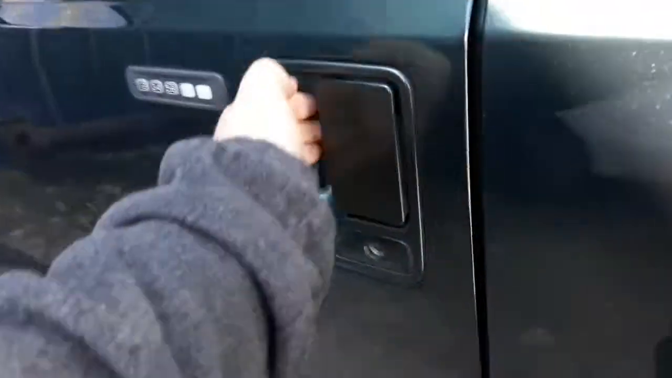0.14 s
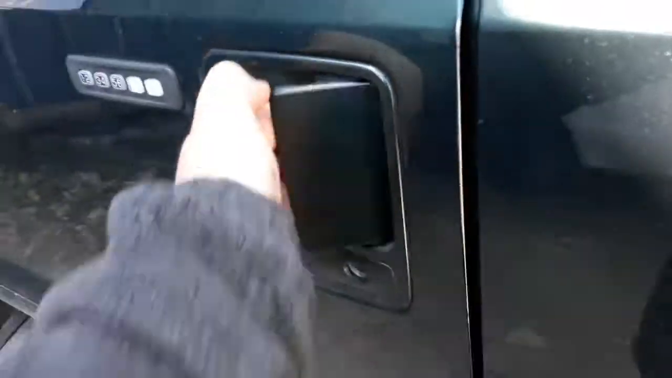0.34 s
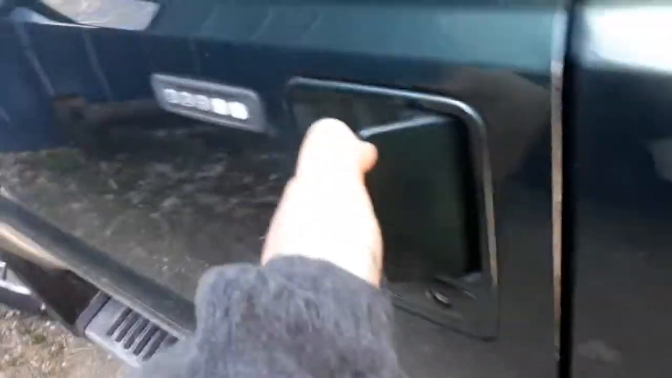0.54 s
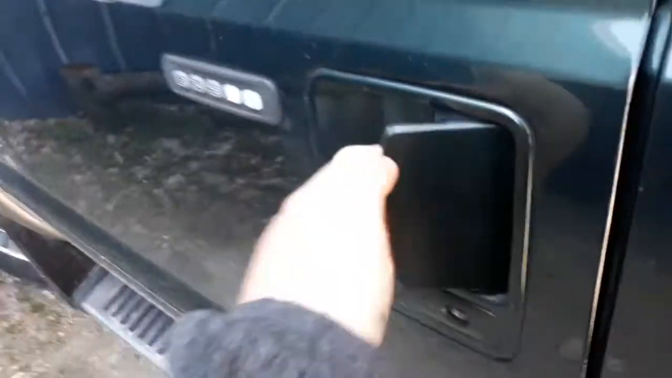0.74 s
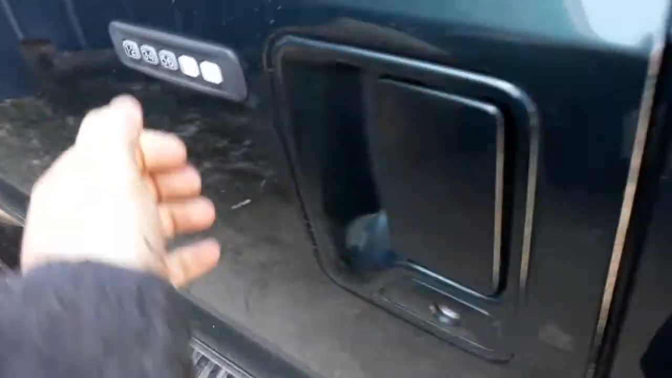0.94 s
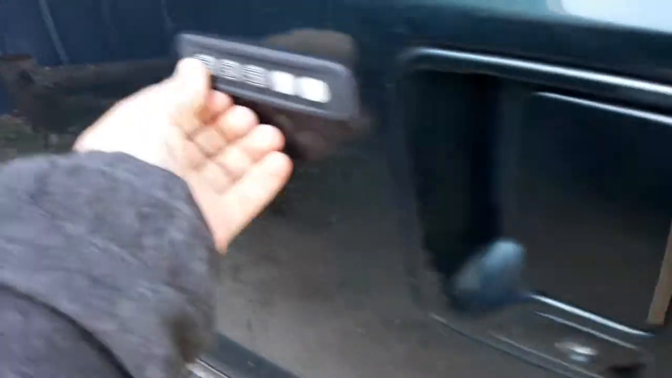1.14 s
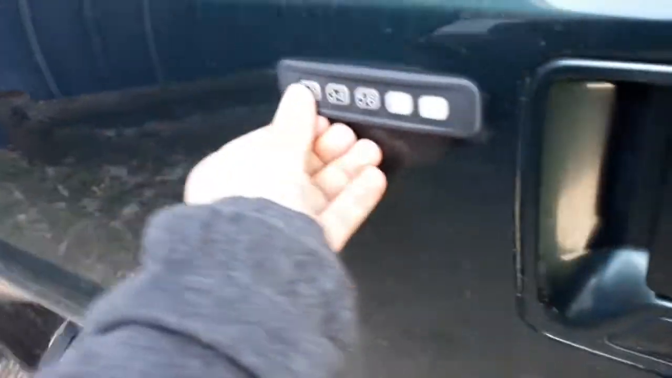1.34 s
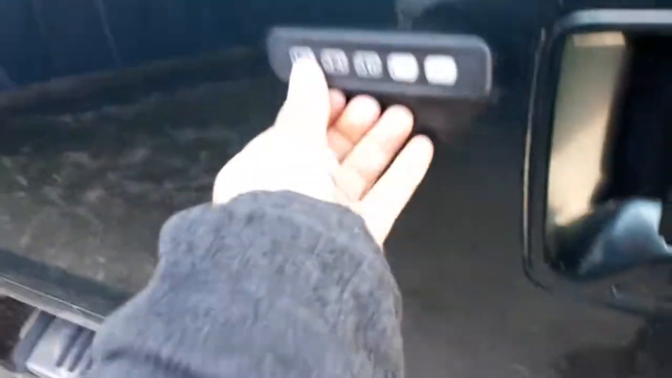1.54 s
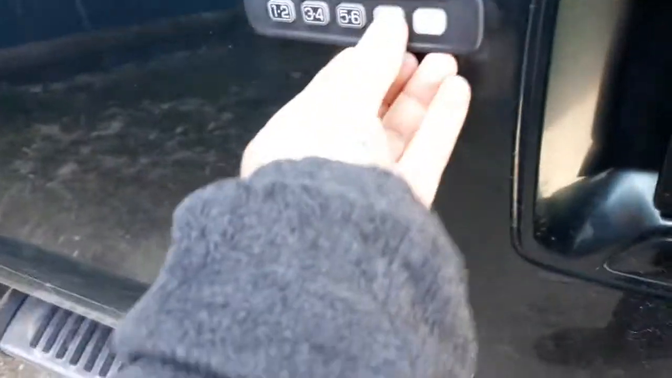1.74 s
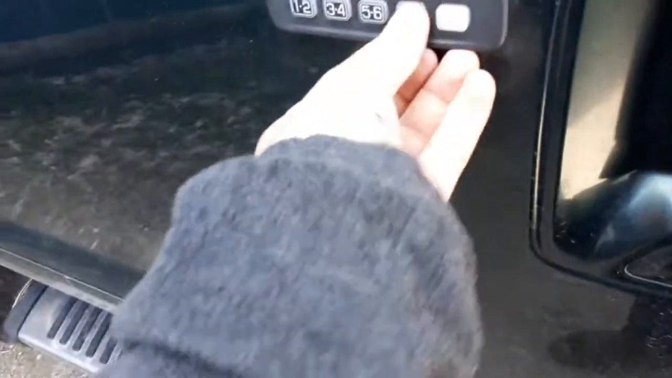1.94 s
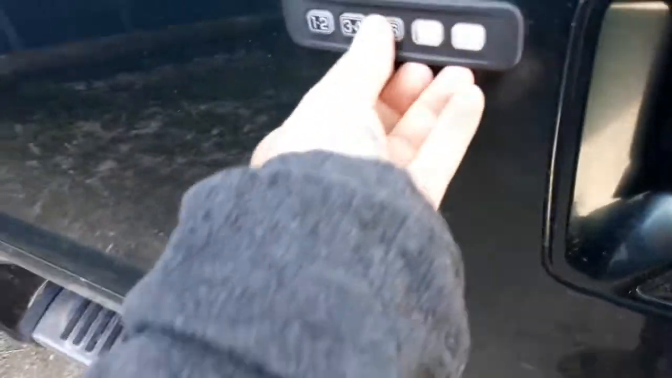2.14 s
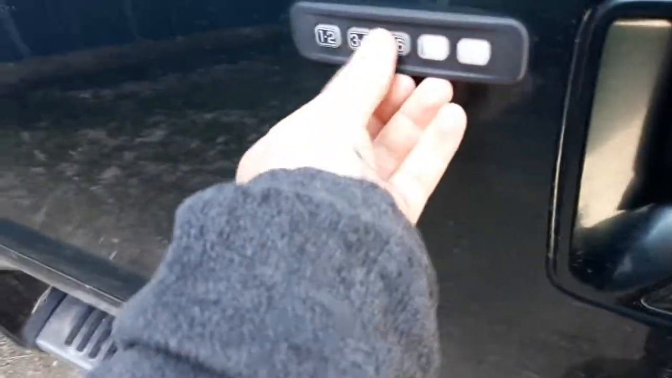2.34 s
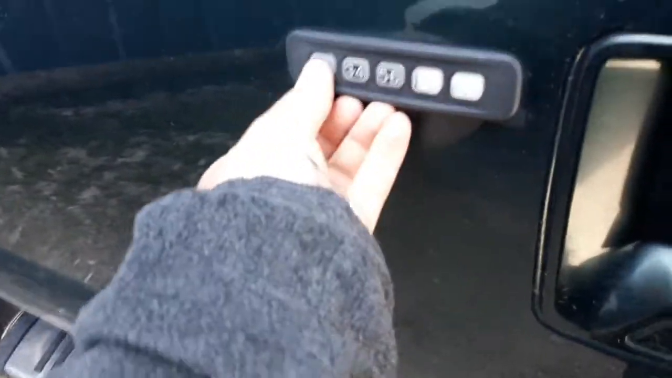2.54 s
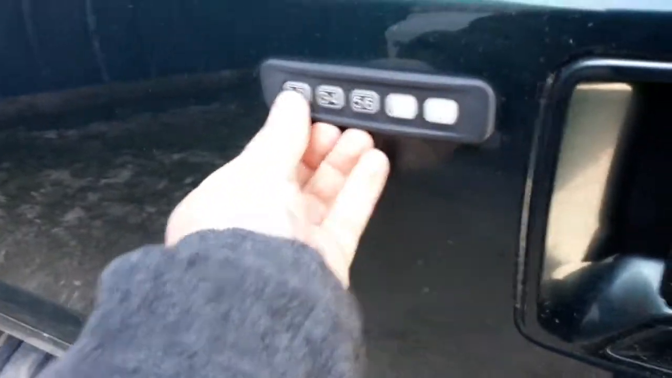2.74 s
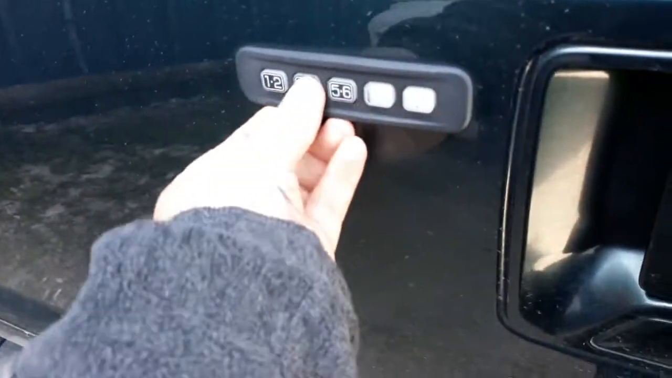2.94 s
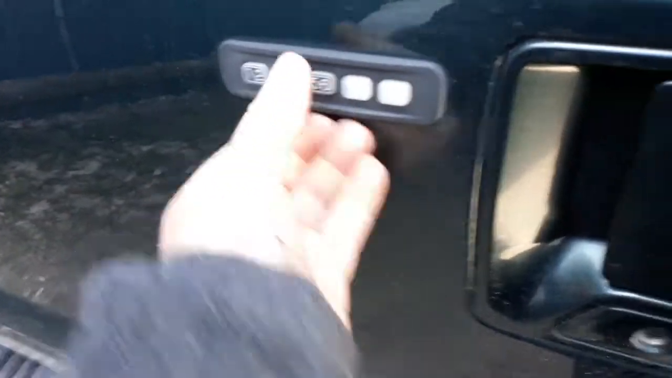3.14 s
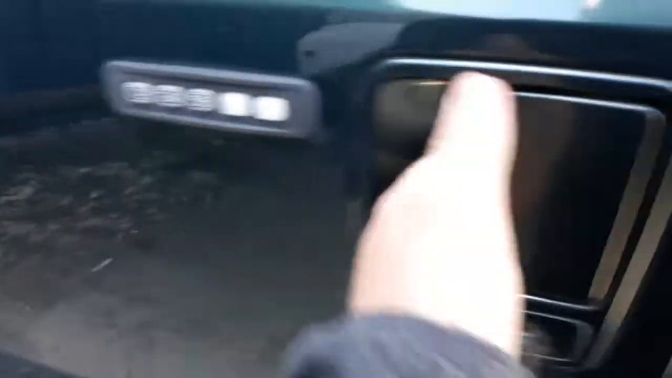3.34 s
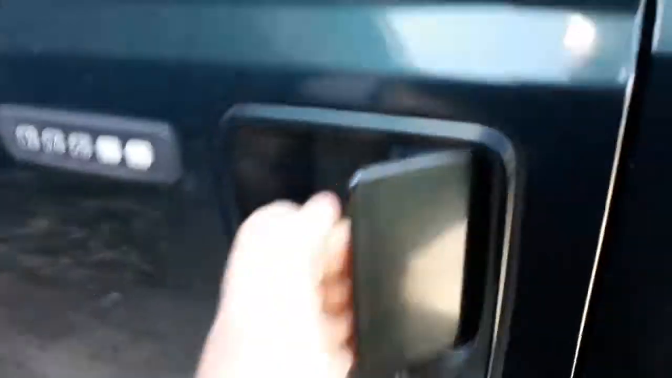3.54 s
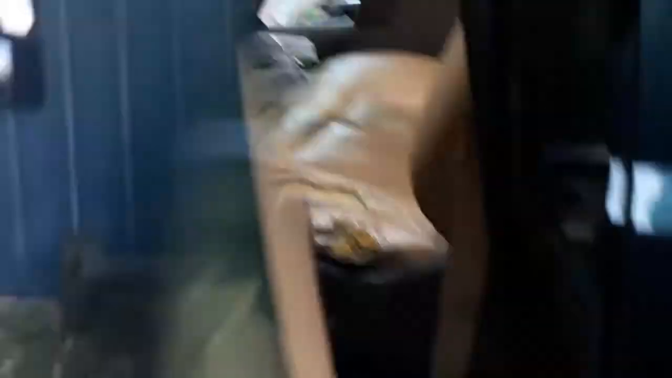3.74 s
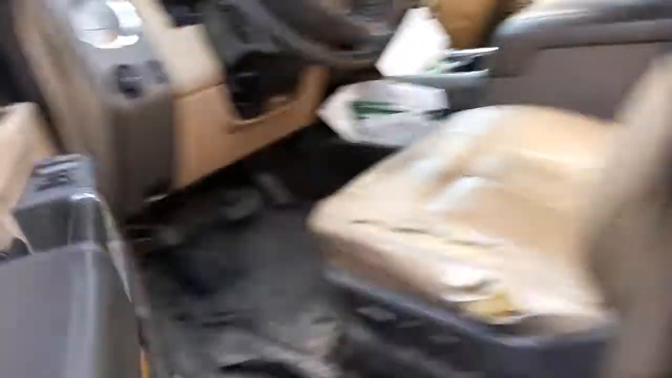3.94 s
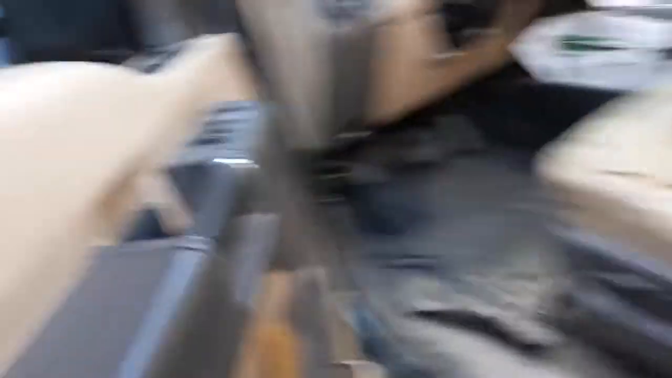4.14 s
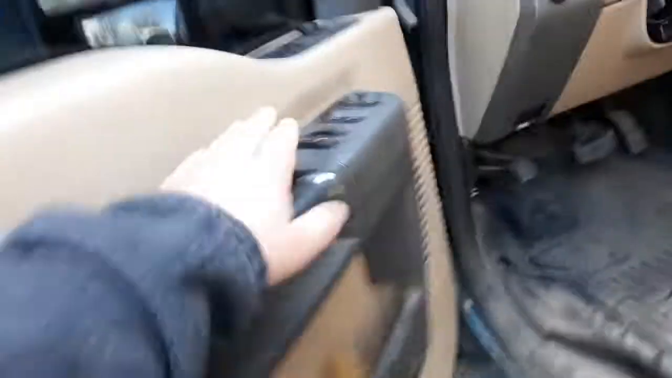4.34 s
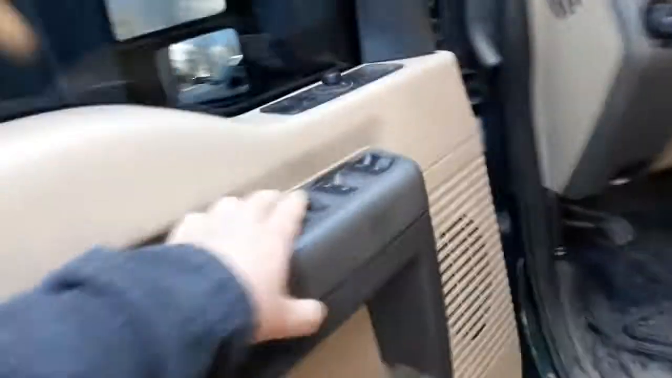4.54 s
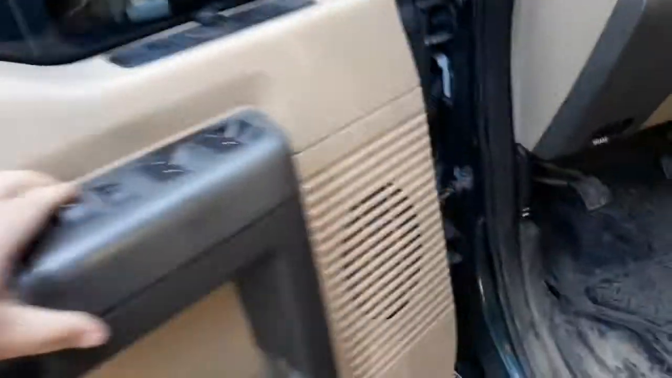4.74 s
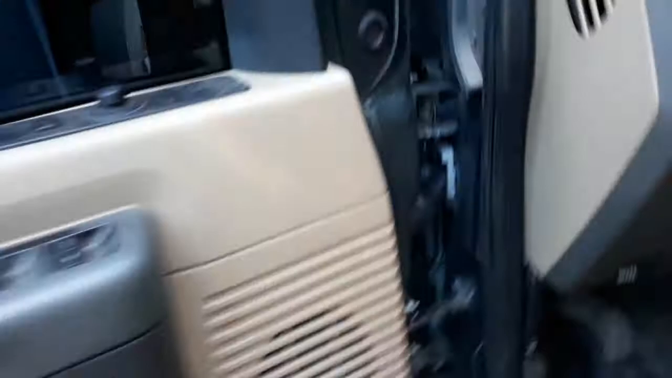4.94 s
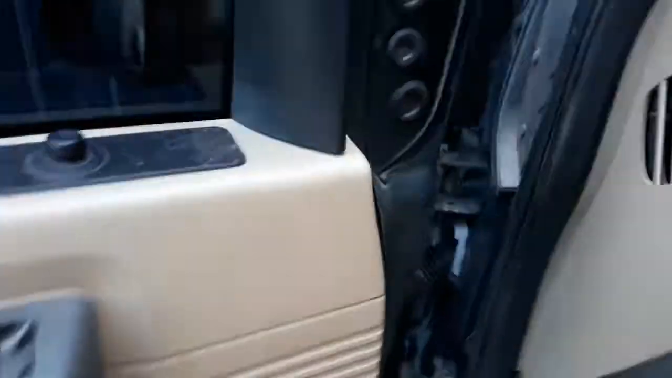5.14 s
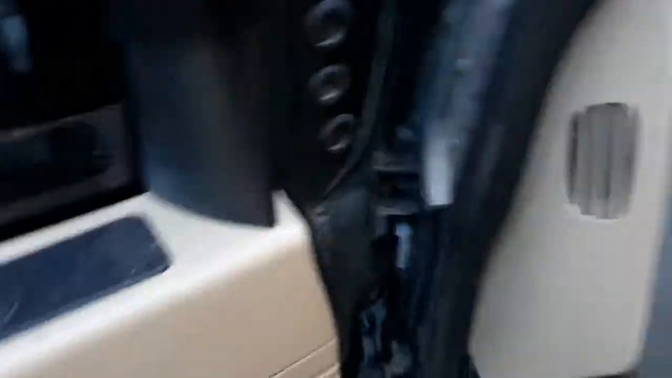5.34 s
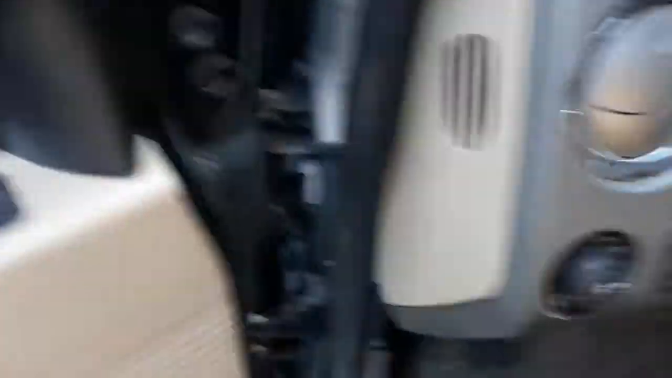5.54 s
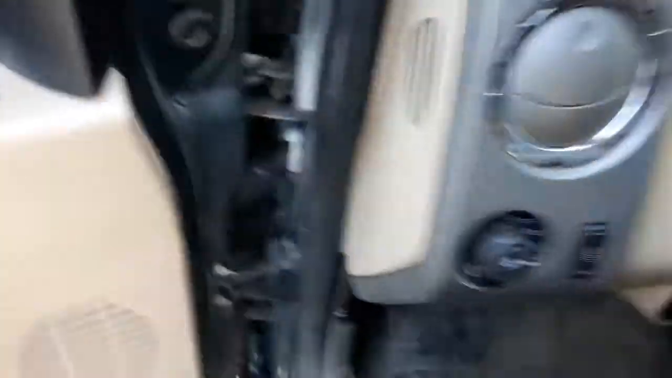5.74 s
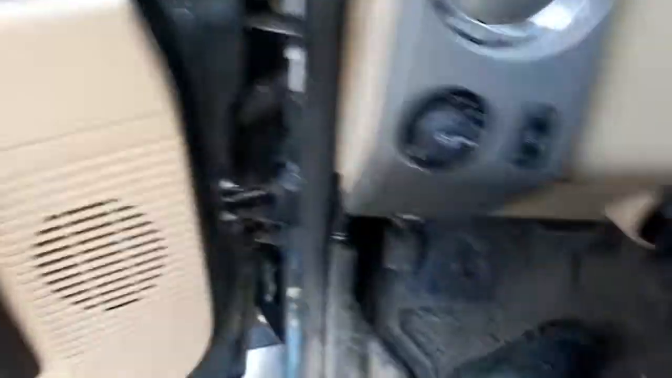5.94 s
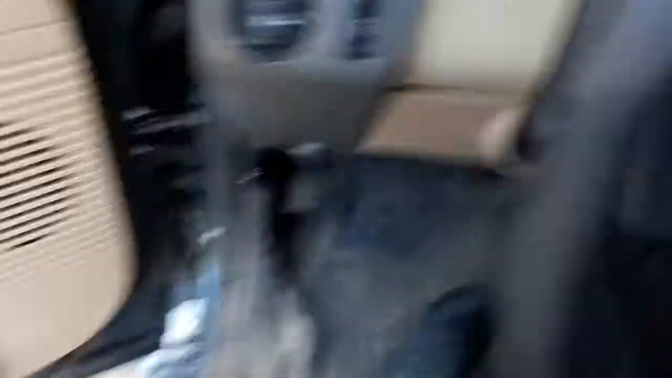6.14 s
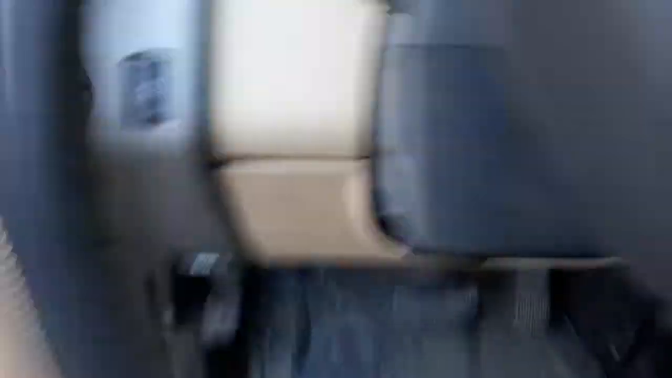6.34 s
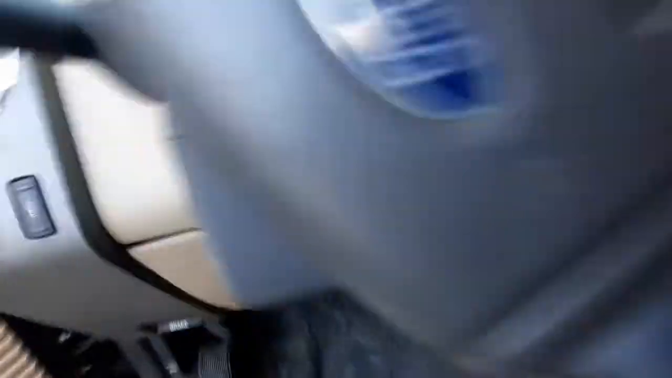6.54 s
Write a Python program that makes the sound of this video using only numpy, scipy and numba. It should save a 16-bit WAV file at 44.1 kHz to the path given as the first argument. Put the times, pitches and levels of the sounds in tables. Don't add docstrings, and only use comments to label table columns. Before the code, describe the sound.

A hand snaps a locked vehicle door handle, taps keypad buttons, the lock thuds, the latch clunks open, then jacket rustle and trim knocks.

```python
import sys
import numpy as np
from scipy import signal
from scipy.io import wavfile
from scipy.ndimage import uniform_filter1d
from numba import njit

SR = 44100
rng = np.random.default_rng(int(sys.argv[2]) if len(sys.argv) > 2 else 0)


def invert_db(x):
    u = np.asarray(x, float) / 20
    return 10 ** u


def to_wav(s):
    ch = np.atleast_2d(s).T
    pcm = np.round(np.clip(ch, -1, 1) * 32767)
    wavfile.write(sys.argv[1], SR, pcm.astype(np.int16))


N = 295029
t = np.arange(N) / SR


@njit
def svf(x, hz, width):
    y, band, low = np.empty(len(x)), 0., 0.
    for i in range(len(x)):
        if i & 63 == 0:
            g, k = np.tan(np.pi * hz[i] / SR), width / hz[i]
        v = (band + g * (x[i] + 1e-18 - low)) / (1 + g * (g + k))
        band, low, y[i] = 2 * v - band, low + 2 * g * v, k * v
    return y


def ring(x, modes, steep=False):
    def one(v, hz, width):
        y = svf(v, hz + 0 * t, 1. * width)
        return 1.473 * svf(y, hz + 0 * t, 1.93 * width) if steep else y

    def body(v):
        total = 0
        for k, (hz, width, db) in enumerate(modes):
            gain = (-1) ** k * invert_db(db) * np.sqrt(SR / np.pi / width)
            total = total + gain * one(v, hz, width)
        return total / np.sqrt(len(modes))
    return np.array([body(v) for v in x])


def walk(rate):
    hold = int(SR / rate)
    steps = np.repeat(rng.standard_normal(N // hold + 1), hold)
    return 1.44 * uniform_filter1d(uniform_filter1d(steps, hold), hold)[:N]


def pair(likeness):
    mid, side = rng.standard_normal((2, N))
    opposed = side * np.array([[1], [-1]])
    return (np.sqrt(1 + likeness) * mid + np.sqrt(1 - likeness) * opposed) / np.sqrt(2)


def swell(s, decay, rise):
    start = max(int((s - rise / 2) * SR), 0)
    u = t[:min(N - start, SR // 2)]
    return start, np.minimum(u / rise, 1) ** 2 * invert_db(-60 * np.maximum(u - rise, 0) / decay)


def contacts(table, body, rise, decay_s, firm, top_db, strike_db, knock_db, chatter_db, tail_db, tail_s):
    force, strike = np.zeros((4, N)), np.zeros((4, 2, N))
    chatter = chatter_db * walk(700)
    signs = np.sign(rng.standard_normal((len(table), 2)))
    for (s, db, ring_db, edge_db), sign in zip(table, signs):
        i, e = swell(s, decay_s * invert_db(-firm * (db + 30)), rise)
        span = slice(i, i + len(e))
        size = invert_db(db + np.array([[ring_db], [0], [edge_db], [edge_db + top_db]]))
        force[:, span] += size * e * invert_db((1.5 - e) * chatter[span])
        strike[:, :, i + int(rise * SR)] += invert_db(strike_db) * size * sign
    strike[0] = invert_db(knock_db) * strike[0, 0]
    fade = invert_db(-60 / tail_s / SR)
    force = force + invert_db(tail_db) * signal.lfilter([1 - fade], [1, -fade], force)
    likeness = (0.11, -0.12, 0.24, 0.044)
    low, mid, edge, top = (f * pair(c) + k for f, k, c in zip(force, strike, likeness))
    low = invert_db(-8.5) * ring(low, body[:1] + [(670, 380, -11.0)], steep=True)
    return low, ring(mid, body[1:], steep=True), edge, top


# start in seconds, peak in dB, low ring in dB, edge in dB.
HANDLE = [(0.192, -51.5, 13, -14), (0.1984, -54, 12, -10), (0.2753, -32.5, -8, -5.5), (0.3164, -35, 1, -8),
          (0.3644, -34.5, -11, -10), (0.4045, -26, -10, -18.5), (0.842, -3, -8.5, -11.5),
          (0.8454, -9.5, -21, -23), (0.8544, -29, 6, -26), (3.3263, -26, 0, -10.5), (3.3374, -39, 10, -15),
          (3.3674, -37, -1, -8)]
# centre in Hz, width in Hz, level in dB.
HANDLE_BODY = [(1180, 405, 2), (2030, 350, -7), (2640, 530, -4.5), (3120, 490, -2.5), (3850, 890, -3.5),
               (4550, 1000, -16.5)]


def handle():
    return contacts(HANDLE, HANDLE_BODY, rise=0.0007, decay_s=0.038, firm=0.13, top_db=-2, strike_db=14.5,
                    knock_db=7.5, chatter_db=-1.0, tail_db=-6.5, tail_s=.12)


# start in seconds, peak in dB, low ring in dB, edge in dB.
CATCH = [
    (3.5025, -10, -5, -13),
    (3.509, -16.5, -7, -17),
    (3.522, -14, -8, -12.5),
    (3.533, -25.5, -11, -12),
    (3.5455, -9, -8, -6.5),
]
# centre in Hz, width in Hz, level in dB.
CATCH_BODY = [(1250, 670, 0.5), (1910, 440, -3.5), (2664, 250, -7), (3380, 480, -3), (3930, 200, -1.5),
              (4330, 290, 2)]


def catch():
    return contacts(CATCH, CATCH_BODY, rise=0.0024, decay_s=0.062, firm=.01, top_db=-4.5, strike_db=14,
                    knock_db=6.5, chatter_db=2.0, tail_db=-13.0, tail_s=0.46)


# start in seconds, peak in dB, low ring in dB, edge in dB.
LATCH = [
    (2.9903, -27.5, -23, -7.5),
    (3.004, -33.5, -6, -4),
    (3.0194, -35.5, 2, -4),
    (3.04, -18, -7, -9.5),
    (3.8232, -30.5, -17, -15.5),
    (3.9104, -49, 10, -4),
    (3.9441, -21.5, 1.5, -5),
    (3.9531, -6, -8.5, -9.5),
    (3.9724, -18, -3, -9),
    (4.0608, -12.5, -6, -12),
]
# centre in Hz, width in Hz, level in dB.
LATCH_BODY = [(1160, 1200, 1.5), (1950, 890, 0), (2740, 590, -3.5), (3200, 340, 0), (3800, 880, -2),
              (4450, 1100, -0.5)]


def latch():
    return contacts(LATCH, LATCH_BODY, rise=0.0016, decay_s=.11, firm=.25, top_db=-7, strike_db=1,
                    knock_db=-1.0, chatter_db=1.0, tail_db=-17.0, tail_s=0.083)


# start in seconds, peak in dB, low ring in dB, edge in dB.
KEYS = [
    (1.0952, -52, -13, -11),
    (1.1424, -57.5, 8, 0),
    (1.1752, -48.5, 9, -6),
    (1.2087, -46, -1, -14),
    (1.2286, -42, -8, -9),
    (1.273, -49, 2.5, -5),
    (1.6566, -31.5, -10.5, -18),
    (2.0894, -54.5, -13, 0),
]


def keys():
    return contacts(KEYS, HANDLE_BODY, rise=0.00087, decay_s=0.028, firm=.01, top_db=-7, strike_db=13.5,
                    knock_db=8.0, chatter_db=0.5, tail_db=1, tail_s=0.16)


# start in seconds, peak in dB, low ring in dB, edge in dB.
TRIM = [(4.1276, -46.5, 6, -6), (4.321, -45, 2, -4), (4.4824, -45, 6, -9), (4.5682, -36, -12, -16),
        (4.6455, -46, -30, -2), (4.6685, -22.5, -5, -5.5), (4.7711, -39.5, -9.5, -7.5),
        (4.8047, -49, -6, 4), (4.975, -33, -12, -15), (5.037, -26, -5.5, -7), (5.057, -39, -13, -5),
        (5.5716, -42.5, -1.5, 3.5), (5.6714, -19.5, -5, -18), (5.7718, -37, -2, -19), (6.0533, -35, 6, -22),
        (6.095, -20.5, -9, -7.5), (6.561, -20.5, -6, -13), (6.65, -29, -3.5, -16)]
# centre in Hz, width in Hz, level in dB.
TRIM_BODY = [(960, 610, 4), (2000, 660, 3), (2700, 510, -3), (3260, 750, -1), (4140, 1400, -4.5)]


def trim():
    return contacts(TRIM, TRIM_BODY, rise=0.0014, decay_s=0.062, firm=0.26, top_db=-12.5, strike_db=7,
                    knock_db=6.5, chatter_db=2.5, tail_db=-15.5, tail_s=0.18)


def seat():
    start_s, step_s, first_db, loss_db = 5.701, 0.012, -29, -2
    slips = [(start_s + k * step_s, first_db + k * loss_db, 1, -30) for k in range(4)]
    return contacts(slips, TRIM_BODY[:3], rise=0.0024, decay_s=0.065, firm=.01, top_db=-6, strike_db=6,
                    knock_db=0, chatter_db=3.5, tail_db=-22, tail_s=.1)


# start in seconds, peak in dB, low ring in dB, edge in dB.
GRIP = [(0.0044, -34.5, -15, 0), (0.0444, -51, -21, 9), (0.0997, -36, -27, 1), (0.1131, -29.5, -37, -9),
        (0.1564, -44, -14, 2), (2.3944, -50, 3, 5), (2.4384, -41, -5, -2), (4.9623, -41, -9, 1),
        (5.015, -35, -21, 3), (5.8513, -31, 1.5, -0.5), (6.253, -31, -13.5, 5.5)]


def grip():
    return contacts(GRIP, HANDLE_BODY, rise=0.00098, decay_s=0.026, firm=.01, top_db=-5.5, strike_db=12.5,
                    knock_db=5.0, chatter_db=3.0, tail_db=-11, tail_s=.12)


# middle in seconds, length in seconds, pitch in Hz, level in dB.
SPRING = (3.5, 0.33, 1200, -42)


def spring():
    middle, length, hz, db = SPRING
    arch = np.cos(np.pi * np.clip((t - middle) / length, -.5, .5))
    drag = arch * invert_db(db + 4.6 * walk(90))
    return ring(drag * pair(.5), [(hz, 130, 0)], steep=True) * invert_db([[-2.5], [2.5]])


# start in seconds, peak in dB, pitch in Hz, decay in seconds.
THUDS = [(0.218, -38.5, 220, 0.12), (0.271, -35, 203, 0.068), (0.404, -30.5, 205, 0.1),
         (0.736, -41.5, 202, 0.092), (0.845, -16.5, 212, 0.14), (2.994, -29, 266.7, 0.3),
         (3.016, -27.5, 329, 0.21), (3.045, -23, 293, 0.15), (3.324, -27.5, 199, 0.22),
         (3.464, -17.5, 273, 0.17), (3.5, -7, 180.2, 0.13), (3.519, -15, 213, 0.19),
         (3.546, -25, 236.6, 0.21), (3.885, -15, 312, 0.04), (3.907, -22.5, 177, 0.093),
         (3.925, -16.5, 316, 0.059), (3.954, -19.5, 366, 0.13), (3.967, -7.5, 225.4, 0.1),
         (4.022, -18, 225, 0.041), (4.061, -22.5, 329, 0.088), (4.128, -32, 257, 0.12),
         (4.176, -34, 250, 0.068),
         (4.667, -30, 337, 0.1), (4.811, -40.5, 325, 0.21), (4.869, -35.5, 398, 0.11),
             (4.89, -39.5, 373, 0.28), (5.032, -26.5, 405, 0.079), (5.172, -33, 321, 0.13),
             (5.571, -33, 320, 0.24), (5.674, -29.5, 382.5, 0.38), (5.707, -21, 393, 0.076),
             (5.723, -18, 254.6, 0.1), (5.849, -37, 275, 0.13), (5.944, -29, 314, 0.32),
             (6.039, -26.5, 452, 0.091), (6.167, -28.5, 173.7, 0.13), (6.529, -29.5, 160, 0.12),
             (6.558, -17.5, 322, 0.092), (6.647, -22, 303, 0.09)]
# centre in Hz, width in Hz, level in dB.
PANEL = [(132, 61, -9.5), (205, 42, -9), (303.6, 24, -9), (380.5, 49, -6), (602, 250, -7.5)]


def thuds():
    spot, push = np.zeros((2, N)), np.zeros(N)
    blows = THUDS
    waver, chance = walk(60), rng.random((len(blows), 2))
    for (s, db, hz, decay), (turn, detune) in zip(blows, chance):
        i, e = swell(s, decay, rise=0.0029)
        span = slice(i, i + len(e))
        phase = 2 * np.pi * (hz * t[:len(e)] + turn) + 0.64 * waver[span] + np.array([[0], [.45]])
        overtone = .5 * np.sin(phase * (1.3 + 0.404 * detune))
        spot[:, span] += invert_db(db) * e * (np.sin(phase) + overtone)
        push[span] += invert_db(db) * e ** 0.85
    skin = ring(push * pair(0.76), PANEL, steep=True)
    return invert_db(-0.5) * spot * invert_db([[-1.5], [1.5]]) + invert_db(-2.5) * skin


# time in seconds, rubbing effort in dB, left minus right in dB as the phone turns.
CLOTH = [(0, -53.5, -13), (.4, -51, -12), (.6, -57.5, -15), (1.3, -61.5, -16.5), (1.9, -65.5, -12.5),
         (2.1, -57.5, -10.5), (2.9, -53, -12.5), (3.3, -50.5, -12.5), (3.6, -44, -16), (3.9, -55, -13),
         (4, -50.5, -8.5), (4.25, -61.5, -7.5), (4.55, -59, -5), (4.74, -69, -3), (5, -56.5, -2.5),
         (5.55, -53, -5), (6.15, -38, -10), (6.69, -44, -11)]


def follow(law):
    s, effort_db, turn_db = np.transpose(CLOTH)
    db, per_effort, per_turn = law
    return invert_db(np.interp(t, s, db + per_effort * (effort_db + 55) + per_turn * (turn_db + 10)))


# dB at effort -55 and turn -10, dB per dB of effort, dB per dB of turn.
BRUSH = (-59.5, .8, 0.23)
SWISH_LAW = (-55, 1.065, 0.011)
EDGE = (-67, 1.13, 0.59)
TOP = (-73.5, 1.11, 1.1)
# middle in seconds, length in seconds, swish in dB, brush and fizz in dB over swish.
STROKES = [(0.095, 0.64, -70.5, -0.5, 1.5), (0.839, 0.02, -38, -3, -8), (1.082, 0.11, -59.5, 6.5, -3.5),
           (2.44, 0.18, -74, -4, 4.5), (2.503, .7, -74, 10, -21), (3.261, 0.057, -49.5, -6, -8.5),
           (3.39, 0.13, -73, 5, 9), (3.467, 0.049, -41, 4.5, -14), (3.637, 0.55, -42.5, -41, -20),
           (3.99, .2, -60.5, 14.5, -15), (4.884, 0.14, -53, 1, -14), (5.171, 0.1, -43.5, -4, -14),
           (5.43, 0.23, -52.5, -6, -9), (5.716, 0.09, -42, 10.5, -16), (5.927, 0.22, -41.5, -3, -16.5),
           (6.383, 0.36, -30.5, -29.5, -16.5)]
# time in seconds, pitch in Hz, level in dB.
HOLLOW = [
    (.1, 3200, -85),
    (.25, 3200, -54),
    (1, 2867, -60.5),
    (1.15, 3200, -71.5),
    (2, 3000, -72.5),
    (3.2, 2600, -55),
    (3.5, 2700, -68),
    (3.68, 2860, -43),
    (4, 2820, -66.5),
]
# centre in Hz, width in Hz, level in dB.
SWISH = [(2200, 990, 1), (3000, 510, 4), (3504, 1270, 4), (4800, 1100, -9.5)]
EDGE_BODY = [(5170, 1970, -1.26), (7000, 1470, -2)]
TOP_BODY = [(10870, 5200, 0), (13260, 3500, -1.5), (15230, 2100, 4)]


def cloth():
    level = np.array([follow(law) for law in (BRUSH, SWISH_LAW, EDGE, TOP)])
    bed = level[1].copy()
    for middle, length, db, brush_db, fizz_db in STROKES:
        arch = np.cos(np.pi * np.clip((t - middle) / length, -.5, .5)) ** 2.78
        level += invert_db(db + np.array([[brush_db], [0], [fizz_db], [fizz_db - 6]])) * arch
    quick = 1 - bed / level[1]
    level *= invert_db(1.27 * walk(400) + 0.48 * walk(20))

    brush_modes = [(660, 227, -3.0), (1030, 480, -0.6), (1332, 470, -0.2), (1660, 730, -0.6)]
    brush = ring(pair(0.092), brush_modes, steep=True)
    fizz = level[2] * ring(pair(0), EDGE_BODY, steep=True) + level[3] * ring(pair(0), TOP_BODY, steep=True)
    s, hz, db = np.transpose(HOLLOW)
    whistle = ring(pair(0), [(np.interp(t, s, hz), 520, 0)], steep=True)
    hollow = whistle * invert_db(np.interp(t, s, db) + 0.5 * walk(40))
    swish = ring(pair(0), SWISH) + quick * ring(pair(0), [(4740, 1000, -4)])
    ports = signal.butter(5, (2000, 5250), "band", fs=SR, output="sos")
    swish = signal.sosfilt(ports, swish)
    return level[0] * brush, level[1] * swish + fizz * invert_db(0.74 * walk(30)) + hollow


# time in seconds, firing rate in Hz.
HUM = [
    (0, 141),
    (.6, 135),
    (.95, 142),
    (1.6, 132),
    (2.1, 124),
    (2.9, 124),
    (3.2, 133.5),
    (4, 131),
]
# start and end in seconds, level in dB at start and at end.
HUM_SPELLS = [
    (0, .5, -38, -63),
    (0.502, 1.3, -58, -49.5),
    (1.3, 1.607, -51.5, -43.5),
    (1.675, 1.774, -47, -44.5),
    (1.853, 1.898, -52, -54),
    (2.046, 2.603, -52.5, -63),
    (2.75, 3.077, -57.5, -29.5),
    (3.127, 3.33, -45.5, -31),
    (3.33, 3.805, -35, -56),
]


def engine():
    s, hz = np.transpose(HUM)
    phase = 2 * np.pi * np.cumsum(np.interp(t, s, hz) * (1 + 0.0069 * walk(25))) / SR
    fade_s = .04
    spells = []
    for a, b, a_db, b_db in HUM_SPELLS:
        outside = np.maximum(np.maximum(a - t, t - b), 0)
        spells.append(np.interp(t, [a, b], [a_db, b_db]) - 20 * outside / fade_s)
    db = np.max(spells, axis=0)
    tone = invert_db(db + walk(15)) * np.sin(phase + np.array([[0], [.4]])) * invert_db([[1.5], [4.5]])
    half = invert_db(np.interp(t, [0, 2, 2.3], [-55, -65, -78]) + 2.8 * walk(7.1)) * np.sin(phase / 2)
    return tone + half


# time in seconds, gust in dB.
AIR = [(0, -48.5), (.5, -61.5), (.9, -57.5), (1.95, -67.5), (2.2, -49.5), (2.6, -47), (3, -43),
       (3.65, -47.5), (3.8, -57), (3.9, -31), (4.15, -47), (4.3, -68), (5.3, -88), (5.8, -75), (6, -51),
       (6.25, -38.5), (6.45, -43.5), (6.69, -46.5)]
# centre in Hz, width in Hz, level in dB.
RUMBLE = [(42, 64, -6), (73, 29, -0.5), (116, 66, 6.5)]
# dB at effort -55 and turn -10, dB per dB of effort, dB per dB of turn.
FLAP = (-56, 0.87, 0.64)


def air():
    gust_db = np.interp(t, *np.transpose(AIR))
    rumble = ring(pair(.45), RUMBLE, steep=True)
    buffet = ring(pair(0.87), [(187.0, 101, 0.11), (336.4, 94, -1.37), (488, 140, -2.1)], steep=True)
    lumps = np.hypot(invert_db(-53 + 0.63 * (gust_db + 49.5)), follow(FLAP))
    lumps = lumps * invert_db(2 * walk(30) + 2.4 * walk(8) + np.array([[-1.0], [1.0]]))
    return rumble * invert_db(gust_db + 2 * walk(8.4)) + buffet * lumps


def scene():
    hits = [handle(), keys(), grip(), latch(), trim(), catch(), seat()]
    low, mid, edge, top = (sum(part) for part in zip(*hits))
    brush, swish = cloth()
    dull = low + brush
    sharp = mid + ring(edge, EDGE_BODY, steep=True) + ring(top, TOP_BODY, steep=True)
    bright = swish + invert_db(-8.0) * sharp
    s, _, turn_db = np.transpose(CLOTH)
    pan_db = np.interp(t, s, turn_db) * np.array([[.5], [-.5]])
    near = dull * invert_db(0.31 * pan_db + 4.5) + bright * invert_db(pan_db + 0.24)
    return near + spring() + thuds() + engine() + air()


def low_pass(x):
    return signal.sosfilt(signal.butter(12, 16820, fs=SR, output="sos"), x)


def record(dry):
    cut = signal.sosfilt(signal.butter(2, 45, "high", fs=SR, output="sos"), dry)
    cut = signal.sosfilt(signal.ellip(8, .3, 32, 15850, fs=SR, output="sos"), cut)
    mix = np.tanh(0.74 * cut) / 0.85
    return low_pass(mix)


dry = scene()
out = record(dry)
to_wav(out)
```